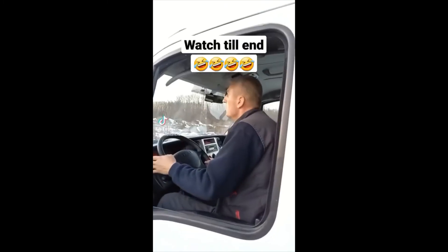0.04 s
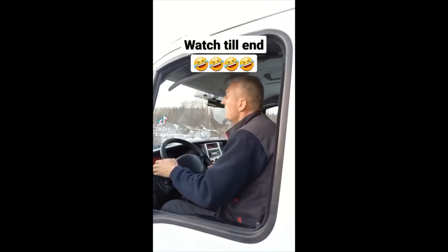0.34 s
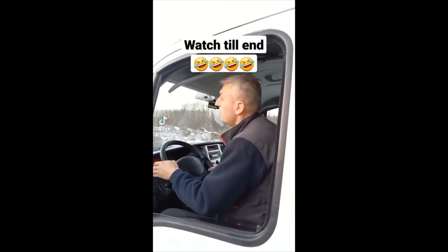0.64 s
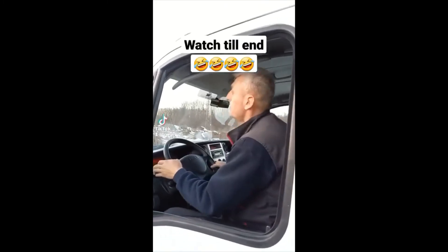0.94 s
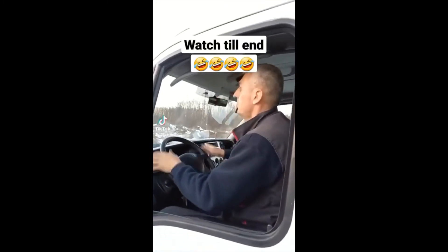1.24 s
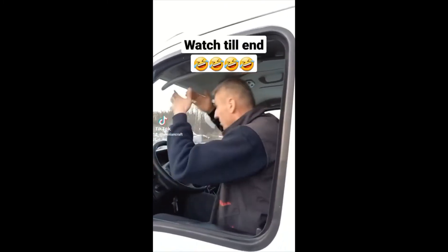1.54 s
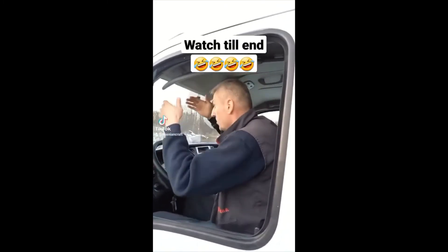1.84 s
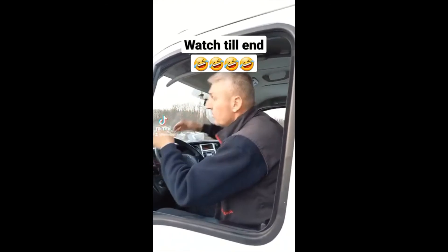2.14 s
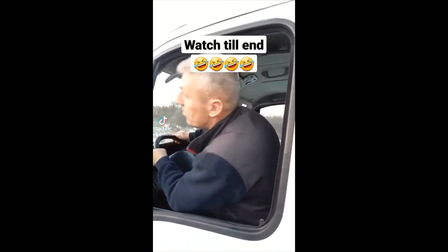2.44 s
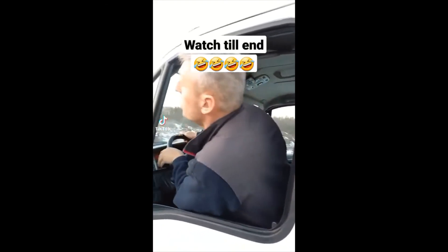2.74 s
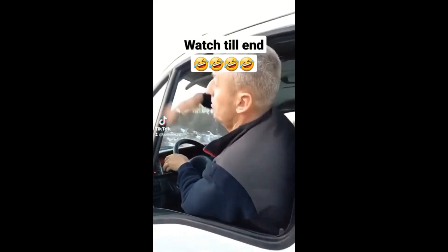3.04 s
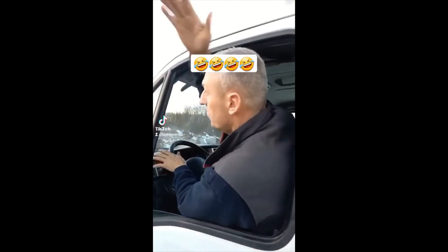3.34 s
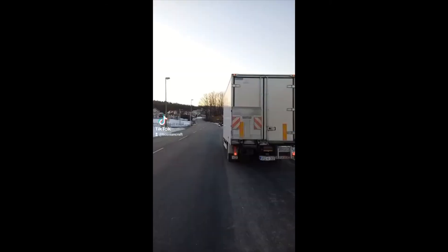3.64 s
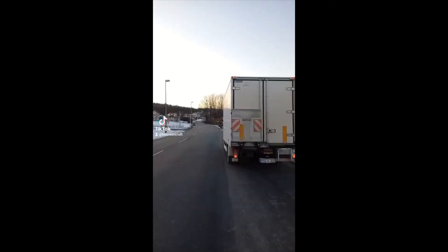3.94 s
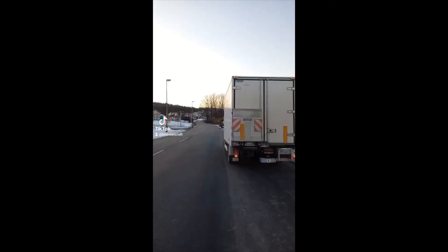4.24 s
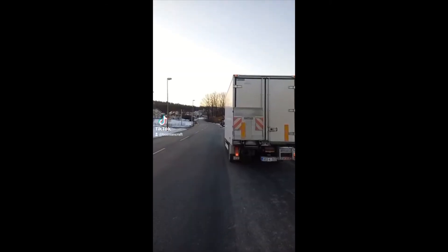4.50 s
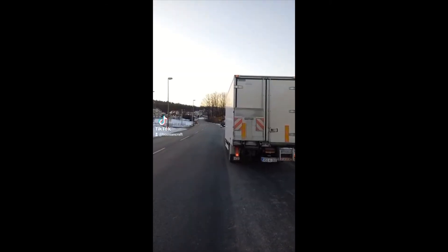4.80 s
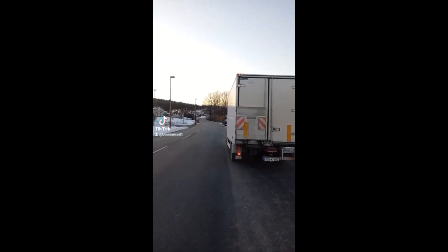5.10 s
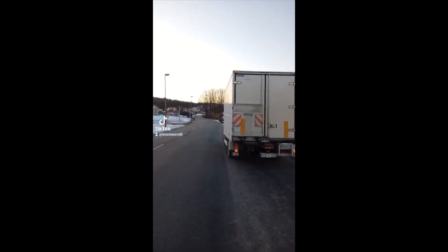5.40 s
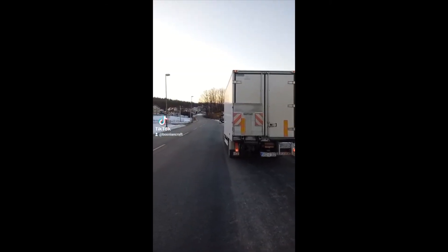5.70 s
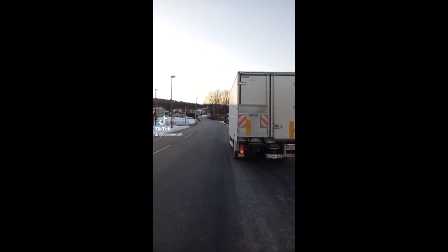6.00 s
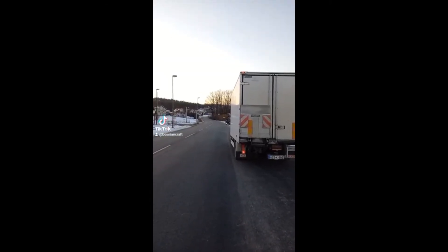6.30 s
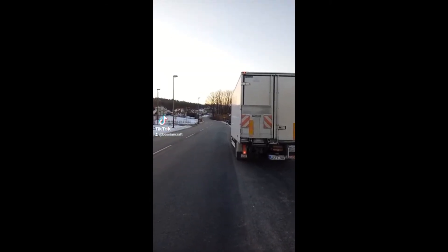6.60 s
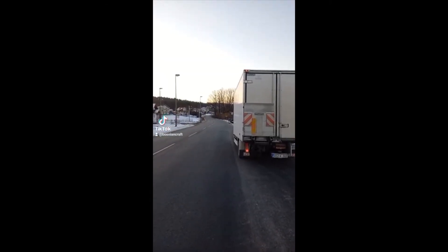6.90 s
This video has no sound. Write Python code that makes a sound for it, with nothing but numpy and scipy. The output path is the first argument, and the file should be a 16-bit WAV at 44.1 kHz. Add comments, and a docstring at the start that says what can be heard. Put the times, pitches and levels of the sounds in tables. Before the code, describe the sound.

A truck horn gives three short toots and a longer one over a diesel idle, followed by a quieter, muffled idle with small clicks.

```python
"""At a truck's open cab window a four-cylinder diesel idles: exhaust booms, injectors clatter.
Its electric diaphragm horn gives three short toots and a longer one, echoed by nearby vehicles;
a gain control ducks under them and creeps back. The scene changes with a short click: on the road
behind a lorry a duller idle fades in, swells and settles, with dull knocks, rustles and one sharp click.
In the last moment the idle is heard closer to the lorry, and brighter."""
import sys
import numpy as np
from scipy import signal
from scipy.fft import rfft, irfft, next_fast_len
from scipy.io import wavfile
from scipy.ndimage import uniform_filter1d, map_coordinates

SR = 44100
rng = np.random.default_rng(int(sys.argv[2]) if len(sys.argv) > 2 else 0)


def generate_wav(signal):
    """Clip the signal to [-1, 1] and save it as 16-bit WAV at the path in sys.argv[1]."""
    frames = np.transpose(np.atleast_2d(signal))
    scaled = np.clip(frames, -1, 1) * 32767
    pcm = np.round(scaled).astype(np.int16)
    wavfile.write(sys.argv[1], SR, pcm)


N = 315315

FIRING_HZ = 80 / 3
ROAD_S, CLOSE_S = 3.587, 6.94  # scene changes
# spectrum of one lorry exhaust beat: freq_hz, level_db
LORRY_BEAT = [(25, -50), (53, -39.5), (80, 5), (107, 6), (133, 2.5), (160, -9.5), (187, -14.5), (300, -34),
              (600, -82)]


def amp(db):
    """Decibels to gain."""
    return 10 ** (np.asarray(db) / 20)


def unit(x):
    """Scale to rms 1."""
    return x / np.sqrt(np.mean(x ** 2) + 1e-20)


def clock():
    """Sample times in seconds."""
    return np.arange(N) / SR


def along(points, hz):
    """Interpolate (freq_hz, value) points on a log axis."""
    freq_hz, values = np.transpose(points)
    return np.interp(np.log(hz + 1), np.log(freq_hz + 1), values)


def wobble(rate_hz):
    """Smooth random curve, rate_hz knots a second."""
    knots, coarse_s = rng.standard_normal(400), clock()[::64]
    return np.interp(clock(), coarse_s, map_coordinates(knots, [coarse_s * rate_hz], mode="wrap"))


def filtered(x, response):
    """Apply a frequency response."""
    size = next_fast_len(N + SR // 4)
    return irfft(rfft(x, size) * response(np.fft.rfftfreq(size, 1 / SR)), size)[..., :N]


def noise(spectrum):
    """Noise of rms 1, shaped by (freq_hz, level_db) points."""
    return unit(filtered(rng.standard_normal(N), lambda hz: amp(along(spectrum, hz))))


def band(centre_hz, half_width_hz):
    """Noise of rms 1 in one resonance."""
    white = rng.standard_normal(N)
    return unit(filtered(white, lambda hz: 1 / (1 + ((hz - centre_hz) / half_width_hz) ** 2)))


def impulse(spectrum, size=16384):
    """Minimum-phase pulse of peak 1, shaped by (freq_hz, level_db) points."""
    cepstrum = irfft(np.log(amp(along(spectrum, np.fft.rfftfreq(size, 1 / SR)))))
    cepstrum[1:size // 2] *= 2
    cepstrum[size // 2 + 1:] = 0
    pulse = irfft(np.exp(rfft(cepstrum)))[:size // 2]
    return pulse / np.abs(pulse).max()


def add(track, start_s, sound):
    """Mix a sound into a track."""
    start = round(start_s * SR)
    part = sound[max(-start, 0):max(N - start, 0)]
    track[max(start, 0):][:len(part)] += part


def swell(centre_s, width_s):
    """Bell-shaped envelope."""
    return np.exp(-np.minimum(2 * ((clock() - centre_s) / width_s) ** 2, 50))


def fade_in(start_s, length_s, bend):
    """Gain rising from near silence to 1."""
    return np.clip((clock() - start_s) / length_s, 1e-3, 1) ** bend


def firings(offset_s):
    """Firing times of the steady idle."""
    return offset_s + np.arange(-4, 192) / FIRING_HZ


def exhaust(spectrum, offset_s, uneven_db, scatter_db, pipe_hz, pipe_width_hz):
    """One boom per firing, one cylinder in four stronger; the pipe delays notes near its resonance."""
    times_s, boom, track = firings(offset_s), impulse(spectrum), np.zeros(N)
    cylinder_db = uneven_db * np.cos((np.arange(len(times_s)) - 1) * np.pi / 2)
    levels_db = cylinder_db + scatter_db * rng.standard_normal(len(times_s))
    for start_s, level_db in zip(times_s, levels_db):
        add(track, start_s, amp(level_db) * boom)
    pipe = lambda hz: np.exp(-2j * np.arctan2(hz * pipe_width_hz, pipe_hz ** 2 - hz ** 2))
    return unit(filtered(track, pipe))


def clatter(decay_s, rattle_db, rasp_db):
    """Each injector pings at its own pitch over a dull rattle; rasp and fizz follow every firing."""
    # injector pings, a row per cylinder: delay_s, level_db, ring_hz
    cylinders = [(0.0049, -20.5, 3520), (0.013, -33, 2700), (0.017, -27, 4100), (.012, -28.5, 3800)]
    track, t = np.zeros(N), np.arange(SR // 20) / SR
    burst = t / decay_s * np.exp(1 - t / decay_s)
    rattle = noise([(500, -27.5), (1500, 6.5), (3200, 1), (5000, -21), (15000, -37.5)])
    rasp = amp(rasp_db) * noise([(1500, -21.5), (2600, -3), (4200, 3), (5000, -3), (7200, 0.5),
                                 (9000, -8.5), (15000, -20.5)])
    fizz = amp(-26.5) * band(14400, 1100)
    for cylinder, (delay_s, level_db, ring_hz) in enumerate(cylinders):
        gate = np.zeros(N)
        for firing_s in firings(0.0145)[cylinder::len(cylinders)]:
            add(gate, firing_s + delay_s, burst * amp(rng.normal(0, 0.7)))
        ring = unit(np.sin(2 * np.pi * ring_hz * clock() + 0.9 * wobble(210)))
        track += gate * (amp(level_db) * (ring + amp(rattle_db) * rattle) + rasp + fizz)
    return track


def cab_idle():
    """Exhaust boom, throbbing combustion noise and clatter at the window."""
    # spectrum of one exhaust beat: freq_hz, level_db
    cab_beat = [(25, -47), (53, -11.5), (80, -1), (107, 1.5), (133, 3.5), (160, -12), (187, -28.5),
                (300, -50), (600, -86.5)]
    # engine and air noise: freq_hz, density_db
    cab_air = [(100, -26.5), (175, -8.5), (235, -1), (285, -4), (370, -4), (450, -14), (520, -7.5),
               (880, -13.5), (1150, -10.5), (1700, -14.5), (2440, -24.5), (3900, -26), (5000, -33),
               (7150, -25.5), (8200, -33), (15500, -31)]
    throb = 1 + 0.05 * np.cos(2 * np.pi * FIRING_HZ * (clock() - 0.03))
    air = amp(-12.5 + 0.41 * wobble(7.5)) * throb * noise(cab_air)
    boom = exhaust(cab_beat, -0.0055, uneven_db=1.14, scatter_db=0.9, pipe_hz=102, pipe_width_hz=44)
    return amp(-13.5) * (boom + air + clatter(decay_s=0.0051, rattle_db=4, rasp_db=-27.5))


def damped_sine(pitch_hz, decay_s=0.00089):
    """Heavily damped sine: a dull knock or short click."""
    t = np.arange(SR // 20) / SR
    return t / decay_s * np.exp(1 - t / decay_s) * np.sin(2 * np.pi * pitch_hz * t)


def blast(length_s, side_share, pitch_hz=419.6, rise_s=0.015, fall_s=0.016):
    """The diaphragm starts flat and dull, blats as it locks on, and slackens when the current stops."""
    # horn tone from the front: harmonic, level_db
    front_tone = [(1, -1), (2, -5), (3, -13.5), (4, -10), (5, -5), (6, -19), (7, -14), (8, -20), (9, -28),
                  (10, -24.5), (11, -27), (12, -26), (13, -22.5), (14, -24.5), (15, -24.5), (16, -31),
                  (17, -27.5), (18, -43), (19, -42), (20, -27), (21, -35.5), (22, -39), (23, -36),
                  (24, -35.5), (25, -38.5), (26, -35.5), (27, -39.5), (28, -31), (29, -31), (30, -27),
                  (31, -41), (32, -30.5), (33, -33), (34, -29.5), (35, -31.5), (36, -44.5)]
    # horn tone side-on: harmonic, level_db
    side_tone = [(1, -0.5), (2, -3), (3, -11.5), (4, -10), (5, -8), (6, -20.5), (7, -11), (8, -17.5),
                 (9, -26.5), (10, -28.5), (11, -37), (12, -31), (13, -33), (14, -27.5), (15, -33.5),
                 (16, -29.5), (17, -24.5), (18, -40), (19, -32.5), (20, -36), (21, -40.5), (22, -41.5),
                 (23, -46.5), (24, -40), (25, -33), (26, -39.5), (27, -35), (28, -26), (29, -30), (30, -28),
                 (31, -36), (32, -39), (33, -34.5), (34, -34.5), (35, -32.5), (36, -42)]
    # flare as the diaphragm locks in and lets go: harmonic, start_db, stop_db
    flares = [(1, -8, -4), (2, 8.5, 5), (3, 10, 3.5), (4, 16, 13.5), (5, -4.5, -7.5), (6, 13.5, 10),
              (7, -2.5, 0.5)]
    flare_db = {round(k): (start_db, stop_db) for k, start_db, stop_db in flares}
    t = np.arange(int((length_s + 0.15) * SR)) / SR
    wander = lambda knots: np.interp(t, np.linspace(0, 1, knots), rng.standard_normal(knots))
    build = 1 - np.exp(-t / rise_s)
    release = np.exp(-np.maximum(t - length_s, 0) / fall_s)
    lock_in = np.exp(-((t - 0.02) / 0.012) ** 2)
    let_go = np.exp(-((t - length_s - 0.014) / 0.014) ** 2)
    flutter = 0.0013 * unit(uniform_filter1d(rng.standard_normal(N)[:len(t)], size=90))
    flat = 0.068 * np.exp(-t / 0.018) + 0.033 * (1 - release ** 2)
    droop = 0.008 * (t - length_s / 2)
    phase = 2 * np.pi * np.cumsum(pitch_hz * (1 - flat - droop + flutter)) / SR
    tone = np.zeros(len(t))
    for (k, front_db), (_, side_db) in zip(front_tone, side_tone):
        start_db, stop_db = flare_db.get(round(k), (0, 0))
        height = min(k, 10) / 10  # high harmonics come late, leave early, waver most
        drift_db = (0.5 + 2.2 * height) * wander(15)
        held_db = (1 - side_share) * front_db + side_share * side_db
        level_db = held_db + start_db * lock_in + stop_db * let_go + drift_db
        envelope = build ** (0.13 + 2 * height ** 2) * release ** (0.39 + 2.1 * height ** 2)
        # the armature strikes once a cycle, keeping the harmonics partly in step
        waver = (0.12 + 0.22 * height) * wander(61)
        tone += amp(level_db) * envelope * np.cos(k * phase + waver + rng.normal(0, 1 + height))
    buzz = (amp(-33.5) + amp(-22.5) * lock_in) * build * release * (1 + np.cos(phase))
    return tone + buzz * rng.standard_normal(N)[:len(t)]


def horn():
    """Four presses: the button knocks, then the horn sounds."""
    # horn blasts: on_s, off_s, level_db, side_share (0-1)
    blasts = [(0.263, 0.42, -6, 0.2), (0.503, 0.707, -5, 0), (0.818, .983, -5, 0.4),
              (2.877, 3.261, -4.5, 0.96)]
    track = np.zeros(N)
    for on_s, off_s, level_db, side_share in blasts:
        add(track, on_s - 0.006, amp(-12.5) * damped_sine(pitch_hz=380, decay_s=0.0016))
        add(track, on_s, amp(level_db) * blast(off_s - on_s, side_share))
    return track


def yard_echo(x):
    """Nearby vehicles scatter a short diffuse echo."""
    # yard decay: freq_hz, t60_s
    decay = [(200, 0.19), (800, .3), (1700, 0.37), (3000, .3), (3350, 0.8), (3800, 0.15), (14000, 0.067)]
    hz, t, spectra = signal.stft(rng.standard_normal(SR // 2), SR, nperseg=256)
    tail = signal.istft(spectra * amp(-60 * t / along(decay, hz)[:, None]), SR, nperseg=256)[1]
    return signal.fftconvolve(x, np.pad(tail, (SR // 60, 0)) / np.linalg.norm(tail))[:N]


def reflection(x, delay_s=0.0262, cutoff_hz=2600):
    """One dull reflection off a vehicle's flat side."""
    return filtered(x, lambda hz: np.exp(-2j * np.pi * hz * delay_s) / (1 + (hz / cutoff_hz) ** 4))


def gain_control(x, aim_db=-18, hold_s=1, recover_db_per_s=4, look_ahead_s=0.0087):
    """Gain falls at a rate set by the squared excess over the aim, holds, then creeps back."""
    hop, low_cut_hz, pull = 256, 280, 1.48
    sensed = filtered(x, lambda hz: hz ** 2 / (hz ** 2 + low_cut_hz ** 2))
    power = np.abs(uniform_filter1d(sensed ** 2, 3 * hop))[::hop]
    step_s, gain_db, quiet_s, gains_db = hop / SR, 0, 0, []
    for level_db in 10 * np.log10(power + 1e-12):
        excess_db = max(level_db + gain_db - aim_db, 0)
        quiet_s = 0 if excess_db else quiet_s + step_s
        slope_db_per_s = recover_db_per_s * (quiet_s > hold_s) - pull * excess_db ** 2
        gain_db = min(gain_db + step_s * slope_db_per_s, 0)
        gains_db.append(gain_db)
    return x * amp(np.interp(clock() + look_ahead_s, clock()[::hop], gains_db))


def knocks_and_scene_click():
    """Scattered dull knocks, and a short click at the scene change."""
    # knocks, and the scene-change click at 3.577 s: start_s, level_db, pitch_hz
    pulses = [(3.201, -18, 298), (3.577, -27.5, 446), (3.937, -32, 414), (4.563, -25, 514),
              (5.2392, -28, 343), (5.287, -28, 317), (5.2994, -25, 328), (5.3238, -21.5, 348),
              (6.92, -32.5, 294.7), (7.134, -30.5, 600)]
    track = np.zeros(N)
    for start_s, level_db, pitch_hz in pulses:
        add(track, start_s, amp(level_db) * damped_sine(pitch_hz))
    return track


def rustles():
    """Bell-shaped puffs of rubbing noise."""
    # rubs: centre_s, width_s, level_db, cutoff_hz
    rubs = [(3.208, .032, -32, 2190), (5.128, .01, -62.5, 7860), (5.365, 0.14, -59.5, 3800),
            (5.63, .02, -68, 12000), (6.905, 0.049, -59.5, 3450), (7.139, 0.015, -46, 2200)]
    track, t = np.zeros(N), np.arange(-SR // 4, SR // 4) / SR
    for centre_s, width_s, level_db, cutoff_hz in rubs:
        rub = signal.lfilter(*signal.butter(2, cutoff_hz, fs=SR), rng.standard_normal(len(t)))
        add(track, centre_s + t[0], amp(level_db) * np.exp(-2 * (t / width_s) ** 2) * unit(rub))
    return track


def road_idle():
    """Muffled idle behind the lorry, with rush, whines and thin hiss; one swell lifts them all."""
    # engine and air noise: freq_hz, density_db
    road_air = [(100, -11), (170, -1.5), (240, -9.5), (360, -10.5), (500, -13.5), (740, -21), (900, -21),
                (1120, -28.5), (1330, -36), (1650, -34), (2100, -37.5), (3000, -59), (3900, -79)]
    # hiss: freq_hz, density_db
    road_hiss = [(1470, -38), (2500, 1), (3120, 1.5), (3550, 0.5), (4200, -1.5), (5450, -3.5), (7340, -1.5),
                 (9660, -8.5), (13700, 0.5), (15500, -5.5)]
    swell_db = 11.5 * swell(centre_s=4.6, width_s=0.65)
    boom = exhaust(LORRY_BEAT, -0.0048, uneven_db=-0.6, scatter_db=1.36, pipe_hz=76, pipe_width_hz=57)
    rumble = amp(-26.5) * noise([(15, -33), (30, -23), (55, 8), (150, 9), (400, -60)])
    rush = amp(8.5) * noise(road_air) + whines(swell_db)
    idle = amp(-34.5) * (boom + rumble) + amp(-59) * rush + amp(-73.5) * noise(road_hiss)
    return fade_in(ROAD_S + 0.0145, length_s=0.3, bend=0.81) * amp(swell_db) * idle


def whines(swell_db):
    """Narrow whines that waver and stand out as the rush grows."""
    # whine bands: centre_hz, width_hz, relative_db
    bands = [(932, 43, -12), (1300, 290, -9.5), (1900, 190, -23.5)]
    lift_db = 0.3 * (swell_db - swell_db.max())
    return sum(amp(relative_db + lift_db + 1.5 * wobble(3.4)) * band(centre_hz, width_hz / 2)
               for centre_hz, width_hz, relative_db in bands)


def hum():
    """A faint tone comes and goes."""
    # hums: centre_s, width_s, level_db, pitch_hz
    hums = [(4.25, 0.061, -44.5, 500), (4.556, 0.069, -36.5, 505), (5.004, .07, -49, 504)]
    return sum(amp(level_db) * swell(centre_s, width_s) * np.sin(2 * np.pi * pitch_hz * clock())
               for centre_s, width_s, level_db, pitch_hz in hums)


def sharp_click(start_s=5.4024, rebound_hz=300, rebound_t60_s=0.0061, scatter_t60_s=0.093):
    """One sharp click, with a dull rebound and a short scatter."""
    # click spectrum: freq_hz, level_db
    spectrum = [(60, -37), (170, -3.5), (300, -0.5), (600, -7), (1200, -13.5), (2200, -16.5), (4000, -23.5),
                (6000, -26), (8600, -33), (9600, -52), (11500, -43), (14500, -25), (16000, -40.5)]
    track, t = np.zeros(N), np.arange(SR // 6) / SR
    pulse = impulse(spectrum)
    rebound = amp(-30 - 60 * t / rebound_t60_s) * np.sin(2 * np.pi * rebound_hz * t)
    scatter = unit(signal.fftconvolve(rng.standard_normal(len(t)), pulse)[:len(t)])
    add(track, start_s, amp(-1) * pulse)
    add(track, start_s, amp(-28.5 - 60 * t / scatter_t60_s) * scatter - rebound)
    return track


def close_idle():
    """Right behind the lorry: a brief gap, then a brighter idle with a thin whistle."""
    # engine and air noise: freq_hz, density_db
    close_air = [(100, -22), (200, 2.5), (550, 1), (800, -2.5), (1150, -0.5), (1500, -8), (1950, -10),
                 (2300, -24), (2950, -20.5), (3700, -38.5), (4050, -19), (4400, -36), (9000, -36),
                 (15000, -45)]
    boom = exhaust(LORRY_BEAT, -0.018, uneven_db=0.6, scatter_db=0.6, pipe_hz=80, pipe_width_hz=55)
    idle = amp(-32.5) * boom + amp(-46) * noise(close_air)
    return fade_in(CLOSE_S + 0.031, length_s=0.17, bend=0.68) * idle


def scene():
    """Cab, road, then close behind the lorry; nearly mono, slightly left."""
    # channel balance: freq_hz, left_minus_right_db
    lean = [(50, .5), (130, .7), (400, 1.1), (800, .3), (2000, 0), (6000, 0), (8000, -1), (13000, 0)]
    # shape of the side signal, in quadrature with the mid: freq_hz, relative_db
    width = [(60, -26), (92, -33.5), (140, -27), (210, -30), (330, -14.5), (500, -11), (770, -22),
             (1170, -37.5), (1790, -39), (2740, -48), (4190, -45.5), (6410, -42), (9810, -7.5),
             (15000, -17.5)]
    at_cab = np.clip((ROAD_S - clock()) / 0.0044, 0, 1)
    at_lorry = np.clip((clock() - CLOSE_S) / 0.00305, 0, 1)
    on_road = 1 - at_cab - at_lorry
    toots = horn()
    window = gain_control(cab_idle() + toots + amp(-14) * reflection(toots) + amp(-17) * yard_echo(toots))
    mono = at_cab * window + on_road * (road_idle() + hum()) + at_lorry * close_idle()
    mono += knocks_and_scene_click() + rustles() + sharp_click()
    sides = np.array([[1], [-1]])
    stereo = lambda hz: amp(sides * along(lean, hz) / 2) + 1j * sides * amp(along(width, hz) - 4.5)
    return filtered(mono, stereo)


def record(dry):
    """Round off the highest peaks and limit the bandwidth."""
    ceiling, top_hz = 0.9, 15600
    rounded = dry / (1 + np.abs(dry / ceiling) ** 8) ** (1 / 8)
    return filtered(rounded, lambda hz: np.clip((top_hz - hz) / 400 + 0.5, 0, 1))


dry = scene()
out = record(dry)
generate_wav(out)
```